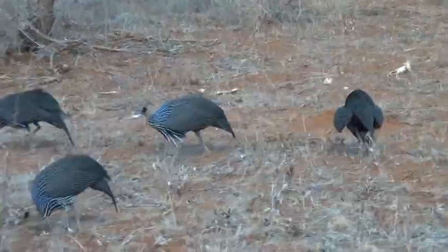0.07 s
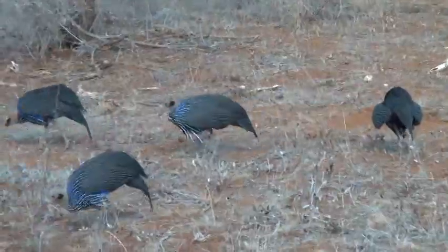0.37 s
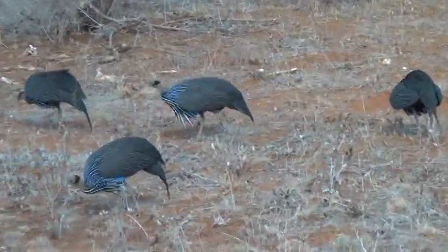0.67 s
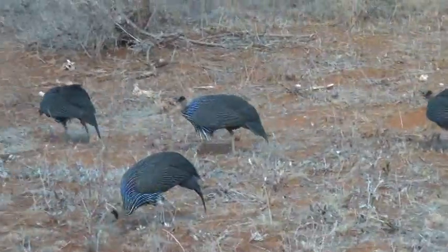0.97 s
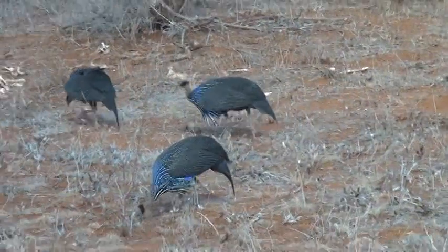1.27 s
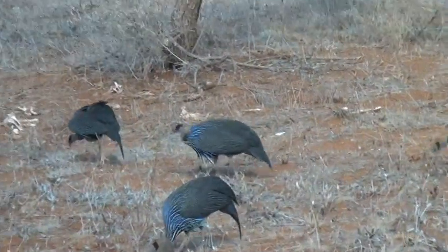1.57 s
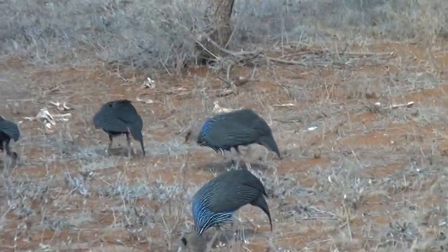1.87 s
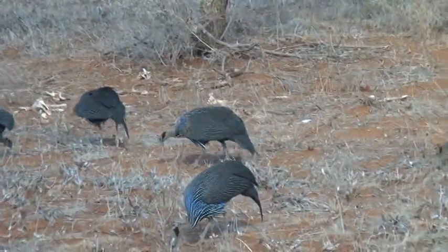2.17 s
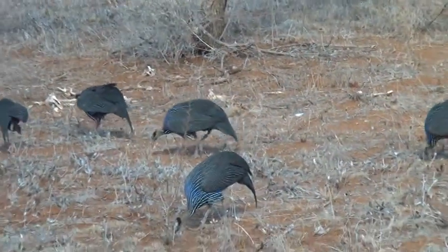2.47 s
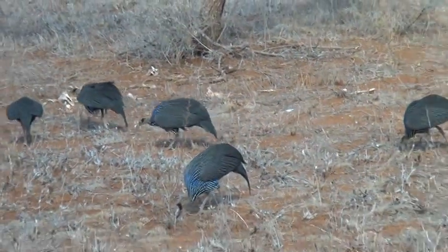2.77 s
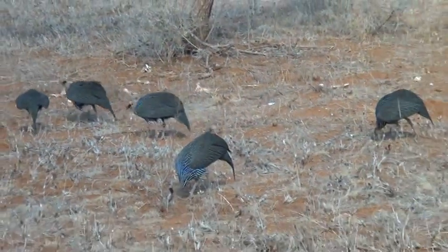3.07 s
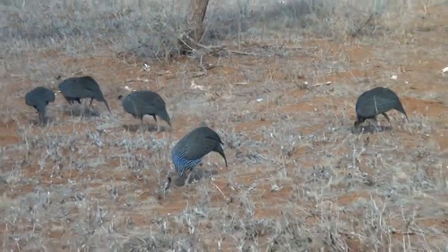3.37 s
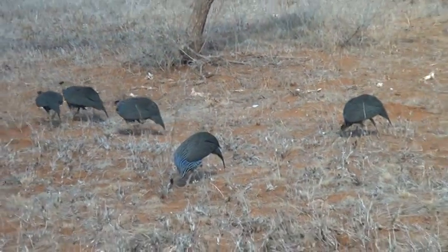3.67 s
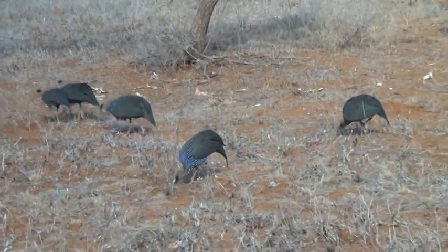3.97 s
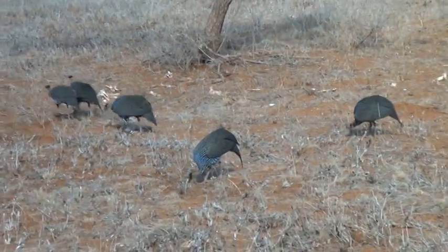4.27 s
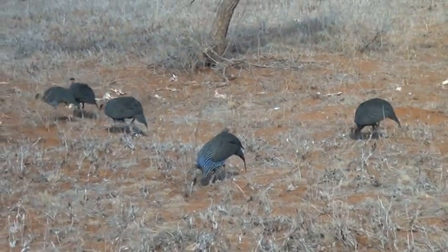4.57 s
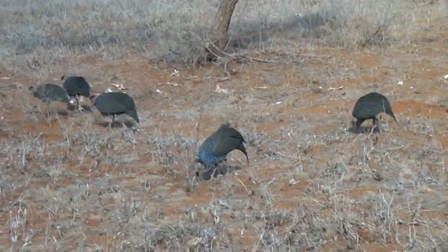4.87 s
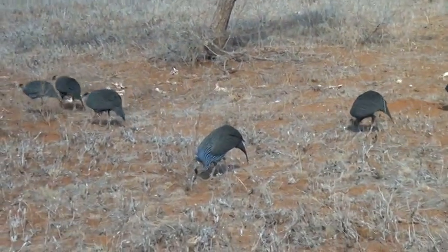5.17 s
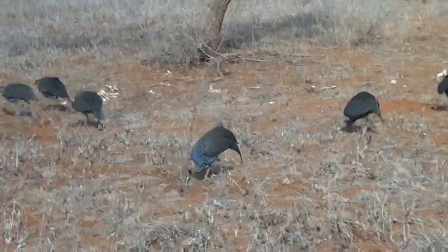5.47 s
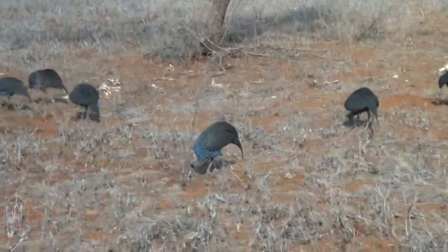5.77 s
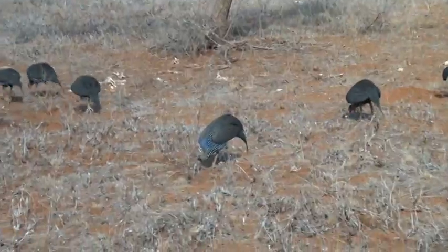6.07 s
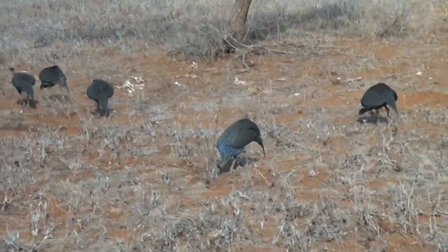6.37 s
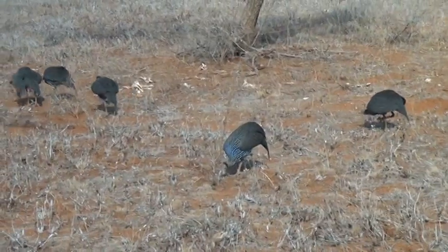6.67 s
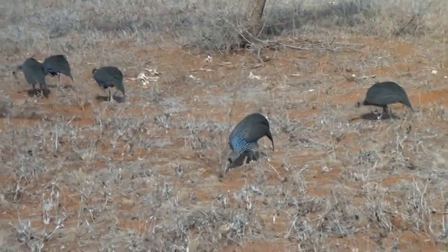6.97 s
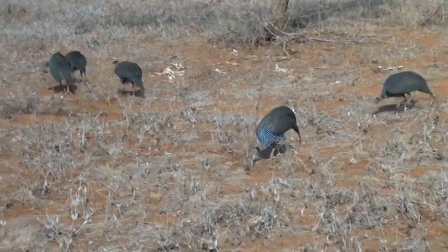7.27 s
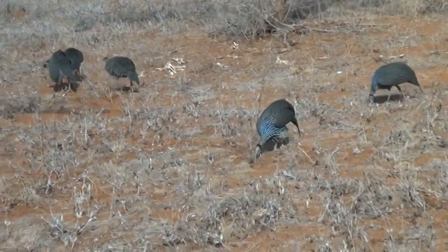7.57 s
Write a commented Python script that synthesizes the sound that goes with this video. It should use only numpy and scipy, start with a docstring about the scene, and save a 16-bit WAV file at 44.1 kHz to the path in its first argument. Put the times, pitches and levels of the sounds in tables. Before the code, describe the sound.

Low, uneven wind buffets the microphone over a quiet outdoor hiss. At the start a nearby guineafowl trills rapidly, turning raspy, and later peeps softly three times. One sharp, hollow scuff comes close by, followed by several light beak stabs in gritty soil. Faint distant whistles, very high twittering and the tick and rustle of dry stalks come and go.

```python
"""A guineafowl's short trill opens close by on the right, on dry, open ground in gusty wind.
The birds forage near the microphone, peeping softly and stabbing the grit with their beaks;
further off, small birds whistle thinly. Dry stalks tick and rustle, and once something close by
scuffs a hollow surface and sets it ringing. Eddies throb, rumble and flutter on the microphone."""
import sys
import numpy as np
from scipy import signal
from scipy.io import wavfile
from scipy.ndimage import uniform_filter1d

SR = 44100
rng = np.random.default_rng(int(sys.argv[2]) if len(sys.argv) > 2 else 0)


def put_to_file(sound):
    """Save the sound as 16-bit audio at rate SR, in the file named by the first command-line argument."""
    columns = np.atleast_2d(sound).T  # one column per channel
    safe = np.clip(columns, -1, 1)
    whole_steps = np.round(safe * 32767)
    wavfile.write(sys.argv[1], SR, whole_steps.astype(np.int16))


N = 336483
TIME = np.arange(N) / SR

# bouts of fine, high twittering: t/s, half length/s, level/dB
TWITTER_BOUTS = [(1.45, .3, -72), (3.02, .17, -66), (5.2, .7, -74), (6.12, .12, -71), (7.48, .22, -64.5)]


def guineafowl_trill():
    """Quick downward hooks, close on the right; towards the end they break into a rasp."""
    # notes: t/s, length/s, relative level/dB
    notes = [(0.094, 0.026, -49.5), (0.282, 0.029, -54.5), (0.347, .018, -56), (0.411, 0.02, -48),
             (0.472, 0.02, -48.5), (0.532, 0.025, -47), (0.594, .026, -49.5), (0.657, 0.019, -49),
             (0.715, 0.0273, -47.5), (.778, 0.016, -44), (0.835, 0.014, -43), (0.896, .015, -43)]
    # shape of one note: share of its length, f/Hz, relative level/dB
    hook = [(0, 3950, -12), (.12, 3410, -2.5), (.26, 2997, 4.5), (.45, 2854, -2), (.82, 2884, 0),
            (1, 3230, -4)]
    # resonances of the throat: f/Hz, gain/dB, t60/s
    throat = [(2930, 4, 0.017), (3300, -1, 0.01), (4260, 1.5, 0.045)]
    last_rasp_db, rasp_growth_db_per_s = -47, 38
    last_s = notes[-1][0]
    hooks = rasp_gain = 0
    for start, length, db in notes:
        hooks += bird_tone(np.array(hook) * [length, 1, 1] + [start, 0, db], waver=.0059)
        gate = np.interp(TIME - start, [.006, .013, .028, .042], [0, 1, 1, 0])
        rasp_gain += from_db(last_rasp_db - rasp_growth_db_per_s * (last_s - start)) * gate
    hiss = rng.standard_normal((2, N))
    rasp = rasp_gain * rms_one(sum(from_db(db) * resonate(hiss, hz, t60) for hz, db, t60 in throat))
    # the held pitch of each note lingers among the bushes and reaches both sides
    held = np.stack([band(hooks, 2800, 3100)] * 2)
    echoes = scatter(held, t60=.5, wet_db=-7) - held
    return pan(from_db(-7) * hooks, left_db=-20) + echoes + pan(rasp, left_db=-3)


def guineafowl_peeps():
    """Soft notes near the microphone: each swells, sags ever faster and ends in an upward flick."""
    # peeps: t/s, length/s, level/dB, opening f/Hz, lowest f/Hz
    calls = [(0.953, 0.054, -42, 4350, 3890), (5.019, 0.054, -39, 4110, 3790),
             (6.801, 0.054, -42, 4200, 3910)]
    flick_hz = 6400
    share = np.array([0, .25, .5, .75, .92, 1])
    contour_db = np.array([-23, -5, -.5, 0, .5, -18])
    sag = (share[:-1] / share[-2]) ** 2.6
    out = 0
    for start, length, db, opening_hz, lowest_hz in calls:
        hz = np.append(opening_hz + (lowest_hz - opening_hz) * sag, flick_hz)
        out += bird_tone(np.column_stack([start + length * share, hz, db + contour_db]), waver=.005)
    return scatter(pan(out, left_db=-1), t60=.17, wet_db=-8)


def pecks():
    """A beak stabs gritty soil on the right: a short crunch with one main resonance."""
    # stabs: t/s, relative grit level/dB, relative ring level/dB, ring f/Hz, grit t60/s
    stabs = [(2.683, -46.5, -47, 3280, 0.034), (2.796, -54, -52, 2010, 0.036), (3.134, -51, -58, 2730, .07),
             (3.377, -44.5, -38, 1006, 0.07), (4.014, -49.5, -54, 2400, .05)]
    out = 0
    for start, grit_db, ring_db, hz, t60 in stabs:
        grit = burst(start, t60)
        struck_spot = resonate(resonate(grit, hz, t60=.029), hz, t60=.006)
        ringing = np.std(grit) * rms_one(struck_spot)
        out += from_db(grit_db + 6) * band(grit, 990, 4700) + from_db(ring_db - 5) * ringing
    return scatter(pan(out, left_db=-6), t60=.081, wet_db=-17)


def scuff():
    """Close by, friction starts bright and dulls as it slows, setting a hollow surface ringing."""
    # modes of the hollow surface: f/Hz, relative level/dB, t60/s
    modes = [(334, -11, 0.045), (526, 3, 0.071), (755, 2, 0.038), (1010, -0.5, 0.035), (1130, -6, 0.053),
             (1177, -3, 0.071), (1310, -29, 0.089), (1520, -11, 0.066), (1985, -5.5, 0.028),
             (2130, -18, 0.091), (2690, -15, 0.038), (3120, -8, 0.023), (3460, -16, 0.028),
             (4600, -12, 0.013)]
    start_s, attack_s, hold_s = 1.9, .009, .011
    peak_db, rise_db, fade_db_per_s = -30.5, 7, 640
    bright_hz, dull_hz, slowing_s = 6800, 1900, .008
    age = np.clip(TIME - start_s, 0, 1)
    # it bites, presses harder, holds, then fades
    pressing_db = rise_db * np.minimum(age / attack_s - 1, 0)
    fading_db = fade_db_per_s * np.maximum(age - attack_s - hold_s, 0)
    corner_hz = dull_hz + (bright_hz - dull_hz) * np.exp(-age / slowing_s)
    grit = rng.standard_normal(N) + .55 * rng.standard_normal((2, N))
    edges = 280 * 2 ** np.arange(0, 6, .5)
    friction = 0
    for k, (low, high) in enumerate(zip(edges, edges[1:])):
        # each band takes a different stretch of the grit
        stretch = np.roll(band(grit, low, high), k * SR // 10, axis=1)
        friction += stretch / np.sqrt((1 + (high / corner_hz) ** 4.25) * (1 + (low / 4600) ** 6))
    friction = even(friction, size=300) * from_db(peak_db + pressing_db - fading_db) * (age > 0)
    ringing = sum(from_db(db) * rms_one(resonate(friction, hz, t60)) for hz, db, t60 in modes)
    return pan(friction + from_db(-6) * np.std(friction) * ringing, left_db=2.5)


def wind():
    """Large eddies throb on the microphone, smaller ones rumble and flutter; stronger wind is brighter."""
    # strength of the wind at the microphone: t/s, level/dB
    strength = [(0.25, -42), (0.68, -43.5), (1.09, -36), (2.88, -34.5), (3.09, -34), (4.11, -31.5),
                (4.67, -34.5), (5.1, -30.5), (5.22, -30), (5.35, -33.5), (6.09, -40.5), (6.6, -33.5),
                (6.81, -34), (7.09, -36.5), (7.51, -32), (7.63, -35.5)]
    # the strongest eddies hit: t/s, half length/s, throb rise/dB, rumble rise/dB
    buffets = [(0.22, .08, 6.5, -0.5), (0.97, 0.1, 5.5, 3), (1.3, 0.047, 10, 3), (1.93, .05, 9.5, 5.5),
               (2.216, 0.053, 10, 7), (2.63, .025, 0.5, 4), (2.968, 0.028, 1, 14), (3.512, .05, 2.5, 5),
               (4.907, 0.041, 10, 9.5), (5.14, 0.036, 2.5, 6), (5.26, 0.028, 10.5, 3.5),
               (5.57, 0.021, 21, 6), (6.455, 0.063, 11, 5.5), (7.077, 0.13, 8.5, 8.5),
               (7.497, 0.037, 3.5, 3.5)]
    # the wind drops for a moment: t/s, half length/s, drop/dB
    lulls = [(0.366, .04, 12), (0.526, 0.06, 4.5), (0.8, 0.066, 6.5), (3.12, 0.17, 2.5), (3.624, 0.036, 7),
             (4.15, 0.085, 5), (4.456, .12, 2), (5.47, 0.074, 5.5), (5.645, 0.022, 7), (6.96, 0.043, 9),
             (7.322, 0.051, 10.5)]
    # spectra of large, middling and small eddies: f/Hz, relative density/dB
    throb_spectrum = [(14, -11), (22, -1), (45, 3.5), (60, -16.5)]
    rumble_spectrum = [(42, -14), (60, 4.5), (85, -1.5), (120, -7), (170, -29)]
    flutter_spectrum = [(90, 1.5), (125, -2.5), (170, 0), (250, -7), (350, -13), (500, -21), (900, -28.5)]
    # short, soft bumps in the rumble: t/s, level/dB, highest f/Hz
    soft_bumps = [(1.211, -40, 370), (1.575, -47, 480), (2.965, -41, 335)]
    usual_db, turbulence_db = -35, 2.5

    def eddies(spectrum, relative_db, patchy_db, size):
        """Eddies of one size, unsteady around their level."""
        noise = even(banded_noise(spectrum, patchy_db), size)
        return from_db(usual_db + relative_db + turbulence_db * drift(7.9)) * noise

    excess_db = np.interp(TIME, *np.transpose(strength)) - usual_db
    lull_db = sum(db * swell(s, half) for s, half, db in lulls)
    throb_gust_db = sum(db * swell(s, half) for s, half, db, _ in buffets) - lull_db
    rumble_gust_db = sum(db * swell(s, half) for s, half, _, db in buffets) - lull_db
    throb_db = 1.5 + .8 * excess_db + throb_gust_db
    rumble_db = 1 + excess_db + rumble_gust_db
    flutter_db = -9.5 + 1.34 * excess_db + .56 * rumble_gust_db
    throb = eddies(throb_spectrum, throb_db, patchy_db=1, size=4400)
    rumble = eddies(rumble_spectrum, rumble_db, patchy_db=2, size=3000)
    flutter = eddies(flutter_spectrum, flutter_db, patchy_db=1.7, size=2500)
    bumps = 0
    for s, db, hz in soft_bumps:
        octave = band(rng.standard_normal((1, N)), hz / 2, hz)
        bumps += from_db(db) * swell(s, .0074) * even(octave, size=900)
    return pan(throb + rumble, left_db=-.8 + .4 * drift(1.6)) + pan(flutter, left_db=-1.1) + bumps


def distant_whistles():
    """Small birds further off: each thin whistle bends in one arc and is loudest in the middle."""
    # whistles: t/s, length/s, level/dB, opening f/Hz, middle f/Hz, closing f/Hz
    calls = [(2.102, 0.055, -61.5, 7200, 7560, 7850), (2.295, 0.13, -63.5, 7400, 7000, 7280),
             (2.403, 0.068, -57, 7250, 7500, 7750), (2.32, 0.051, -62, 3700, 2460, 2000),
             (2.614, 0.04, -60, 3300, 3010, 3280), (3.534, 0.022, -58.5, 4800, 3750, 3370),
             (3.544, .118, -51.5, 3400, 3305, 3400), (5.98, 0.059, -57, 4600, 4660, 4800),
             (6.13, .088, -60, 6800, 7470, 7500), (6.298, .075, -54, 6400, 7030, 7320),
             (6.373, .024, -52, 7160, 7400, 7650)]
    edge_drop_db = 7
    along = np.linspace(-1, 1, 11)
    out = 0
    for start, length, db, opening_hz, middle_hz, closing_hz in calls:
        times = start + length * (along + 1) / 2
        slope_hz = (closing_hz - opening_hz) / 2
        bend_hz = (closing_hz + opening_hz) / 2 - middle_hz
        hz = middle_hz + slope_hz * along + bend_hz * along ** 2
        out += bird_tone(np.column_stack([times, hz, db - edge_drop_db * along ** 2]), waver=.0063)
    return scatter(pan(out, left_db=-3), t60=.33, wet_db=-4)


def chirps():
    """Tiny, very high chirps on the right: a few clear ones, and faint ones during the twittering."""
    # the clearest chirps: t/s, level/dB, f/Hz
    clear = [(1.4805, -63, 9970), (1.6965, -63, 10000), (2.8843, -53.5, 10260), (2.9357, -61, 15100),
             (3.0814, -60, 10900), (3.2625, -61, 11100), (3.3293, -61, 13200), (5.003, -61, 10930),
             (5.4655, -62, 10200), (5.6905, -61, 11900), (5.7917, -59, 11050), (6.3355, -61, 10900),
             (7.0938, -60, 11900), (7.35, -56, 9820)]
    faint_per_s, faint_db, low_hz, high_hz = 2.5, -63, 9750, 13200
    attack_s, fade_s, edge_drop_db = .008, .0217, 23
    activity = np.cumsum(bouts(TWITTER_BOUTS))
    faint = []
    for when, height in rng.random((int(faint_per_s * N / SR), 2)):
        s = np.interp(when * activity[-1], activity, TIME)
        faint.append((s, faint_db, low_hz + (high_hz - low_hz) * height ** 2))
    out = 0
    for s, db, hz in list(clear) + faint:
        top_s, edge_db = s + attack_s / 2, db - edge_drop_db
        contour = [(top_s - attack_s, hz, edge_db), (top_s, hz, db), (top_s + fade_s, hz, edge_db)]
        out += bird_tone(contour, waver=.015)
    return scatter(pan(out, left_db=-7), t60=.15, wet_db=-6)


def stalk_snaps():
    """Dry stalks give way, each with a bright tick."""
    # snaps: t/s, relative level/dB
    snaps = [(2.8845, -52), (3.081, -59), (3.1144, -55), (7.34, -57), (7.357, -54)]
    ticks = sum(from_db(db + 4) * burst(s, t60=.035) for s, db in snaps)
    return scatter(pan(band(ticks, 9500, 14500), left_db=-2), t60=.08, wet_db=-4)


def brushes():
    """Brief strokes of something dry sliding past, each with its own colour."""
    # strokes: t/s, half length/s, level/dB, lowest f/Hz, highest f/Hz
    strokes = [(4.432, 0.012, -49.5, 600, 4900), (4.64, 0.21, -53.5, 1080, 3200),
               (5.083, 0.023, -50, 1700, 5400), (5.253, 0.035, -53.5, 1100, 3830),
               (5.464, 0.066, -50, 1790, 3140), (5.473, 0.08, -51, 550, 1360),
               (6.483, 0.055, -58.5, 7000, 12000)]
    hiss = rng.standard_normal(N) + 1.54 * rng.standard_normal((2, N))
    out = 0
    for s, half, db, low, high in strokes:
        out += from_db(db) * swell(s, half) * rms_one(band(hiss, low, high))
    return pan(out * from_db(2.6 * drift(35)), left_db=-4)


def grass():
    """Dry grass rustles in bouts, and faintly in between."""
    # bouts of rustling: t/s, half length/s, level/dB
    rustling = [(0.75, 0.46, -58.5), (1.4, 0.3, -56.5), (1.82, 0.15, -57.5), (4.25, .15, -57.5),
                (4.68, 0.25, -52.5), (5.2, 0.22, -57), (7.22, 0.37, -59.5)]
    # spectrum of the rustle: f/Hz, relative density/dB
    spectrum = [(400, -5.5), (700, 2), (1400, 2), (2800, -2), (4500, -3.5), (8000, -21.5), (15000, -31)]
    rest_db = -68.5
    return pan((from_db(rest_db) + bouts(rustling)) * banded_noise(spectrum, patchy_db=2.5), left_db=-2)


def twitter():
    """A fine, high tinkling of many tiny ticks."""
    # pitches of the ticks: f/Hz, gain/dB
    pitches = [(9400, 3), (9900, 1), (10350, 7), (11100, -9), (11900, -19)]
    ticks_per_s = 250   # at each pitch
    tinkle = 0
    for hz, db in pitches:
        onsets = rng.random(N) < ticks_per_s / SR
        strengths = from_db(4.5 * np.minimum(rng.exponential(1, (2, N)), 4))
        ticks = onsets * strengths * rng.choice([-1, 1], N)
        tinkle += from_db(db) * resonate(ticks, hz, t60=.0054)
    return bouts(TWITTER_BOUTS) * rms_one(tinkle)


def open_air():
    """The quiet, wide hiss of open ground behind everything."""
    # spectrum of the air: f/Hz, relative density/dB
    spectrum = [(100, -1), (300, 0), (700, -2), (1100, -5.5), (2000, -10.5), (3200, -13.5), (5500, -16),
                (8200, -17), (9300, -21), (10500, -19.5), (15500, -25)]
    return from_db(-51.5) * banded_noise(spectrum, patchy_db=1.03)


def scatter(x, t60, wet_db):
    """Trunks and bushes throw back a thin, quickly dying spray of echoes, different on each side."""
    t = TIME[:SR // 2]
    echoes = rng.standard_normal((2, len(t))) * (rng.random((2, len(t))) < .05)
    echoes *= (t > .003) * from_db(-60 * t / t60)
    echoes /= np.sqrt(np.sum(echoes ** 2, axis=1, keepdims=True))
    return x + from_db(wet_db) * signal.fftconvolve(x, echoes, axes=1)[:, :N]


def bird_tone(rows, waver):
    """A nearly pure tone along rows of t/s, f/Hz, level/dB, with a slightly unsteady pitch."""
    s, hz, db = np.transpose(rows)
    span = (TIME > s[0]) & (TIME < s[-1])
    t, out = TIME[span], np.zeros(N)
    unsteady = rms_one(band(rng.standard_normal(SR // 2), 39, 400))[-len(t):]
    phase = 2 * np.pi * np.cumsum(np.interp(t, s, hz) * (1 + waver * unsteady)) / SR
    envelope = from_db(np.interp(t, s, db)) * signal.windows.tukey(len(t), .06)
    out[span] = np.sqrt(2) * envelope * np.sin(phase)
    return out


def banded_noise(spectrum, patchy_db):
    """Half-octave bands of stereo noise, each with its own flicker and width; rms 1."""
    # how alike the microphone's two sides are: f/Hz, likeness from 0 to 1
    likeness = [(30, 0.97), (90, .93), (180, 0.76), (350, 0.58), (700, 0.75), (1500, 0.42), (3000, 0.14),
                (6000, 0.05), (12000, 0.057)]
    edges = 18 * 2 ** np.arange(0, 10.1, .5)
    out, white = 0, rng.standard_normal((2, 2, N))
    for k, (low, high) in enumerate(zip(edges, edges[1:])):
        if high < spectrum[0][0] or low > spectrum[-1][0]:
            continue
        mid, side = band(white[k % 2], low, high)
        hz = np.sqrt(low * high)
        alike = at_hz(likeness, hz)
        gain = from_db(at_hz(spectrum, hz) + patchy_db * drift(18))
        out += gain * (np.sqrt(1 + alike) * mid + np.sqrt(1 - alike) * side * [[1], [-1]])
    return rms_one(out)


def burst(start, t60):
    """A puff of noise that starts at once and dies away."""
    age = TIME - start
    return rng.standard_normal(N) * (age > 0) * from_db(-60 * np.clip(age / t60, 0, 3))


def swell(centre, half_length):
    """A smooth rise and fall around a moment."""
    return np.exp(-np.minimum(((TIME - centre) / half_length) ** 2, 20))


def bouts(rows):
    """A gain that swells and fades along rows of t/s, half length/s, level/dB."""
    return sum(from_db(db) * swell(s, half) for s, half, db in rows)


def drift(rate_hz):
    """A slow random wander with a spread of 1."""
    hop, settling = 40, 2000
    r = np.exp(-2 * np.pi * hop * rate_hz / SR)
    noise = rng.standard_normal(N // hop + settling + 2)
    slow = signal.lfilter([1], [1, -2 * r, r * r], noise)[settling:]
    return np.interp(np.arange(N) / hop, np.arange(len(slow)), rms_one(slow))


def resonate(x, hz, t60):
    """One resonance with a gain of 1 at its peak."""
    r = from_db(-60 / (t60 * SR))
    feedback = [1, -2 * r * np.cos(2 * np.pi * hz / SR), r * r]
    return signal.lfilter(np.array([1, 0, -1]) * (1 - r * r) / 2, feedback, x + 1e-18)


def band(x, low_hz, high_hz):
    """A gentle band-pass."""
    sos = signal.butter(2, [low_hz, min(high_hz, .45 * SR)], "band", fs=SR, output="sos")
    return signal.sosfilt(sos, x + 1e-18)


def even(x, size):
    """Hold a noise at a steady level over spans of `size` samples."""
    return x / np.sqrt(uniform_filter1d(np.mean(x ** 2, axis=0), size) + 1e-12)


def pan(x, left_db):
    """Place a sound by its left-right level difference."""
    return x * from_db(np.array([[1], [-1]]) * left_db / 2)


def at_hz(points, hz):
    """Read a curve on a log-frequency axis."""
    f, value = np.transpose(points)
    return np.interp(np.log(hz), np.log(f), value)


def rms_one(x):
    """Scale to an rms of 1."""
    return x / np.sqrt(np.mean(x ** 2) + 1e-20)


def from_db(db):
    """Decibels to gain."""
    return 10 ** (np.asarray(db) / 20)


def scene():
    """Open ground, birds near and far, and the scuff, all heard from one microphone position."""
    ground = open_air() + wind() + grass() + brushes()
    birds = guineafowl_trill() + guineafowl_peeps() + distant_whistles() + pecks()
    return ground + birds + twitter() + chirps() + stalk_snaps() + scuff()


def record(dry):
    """The sound opens after a moment of silence; the top is cut steeply."""
    start_s, fade_in_s, cutoff_hz = .078, .008, 15760
    opened = dry * np.clip((TIME - start_s) / fade_in_s, 0, 1)
    return signal.sosfilt(signal.ellip(16, .1, 80, cutoff_hz, fs=SR, output="sos"), opened)


dry = scene()
out = record(dry)
put_to_file(out)
```